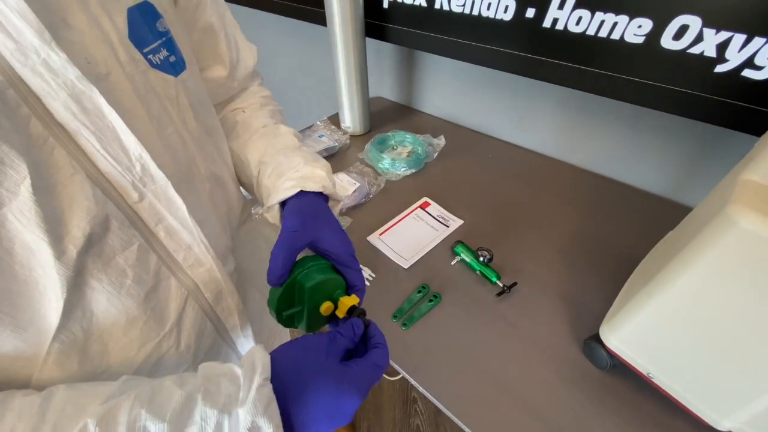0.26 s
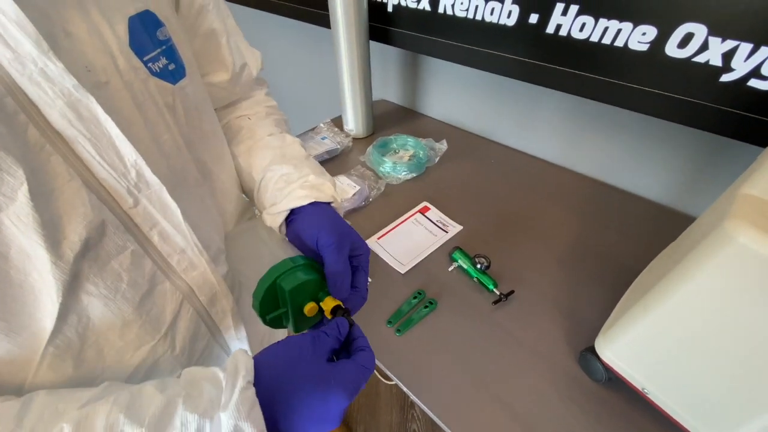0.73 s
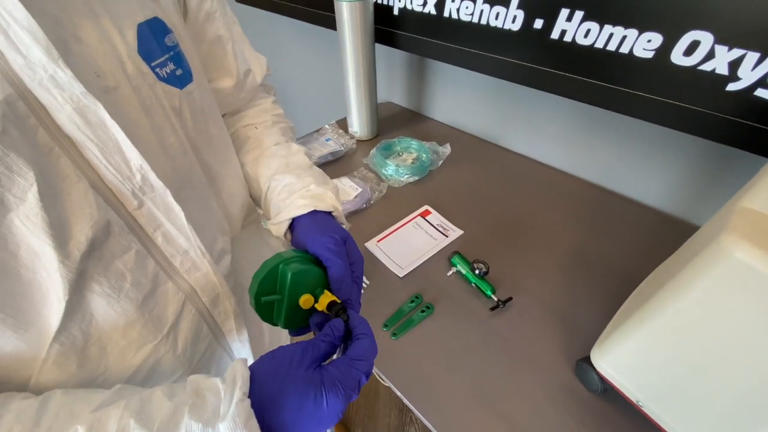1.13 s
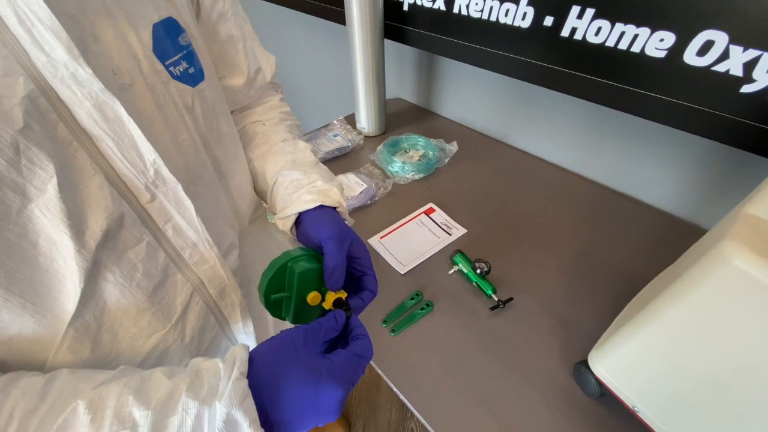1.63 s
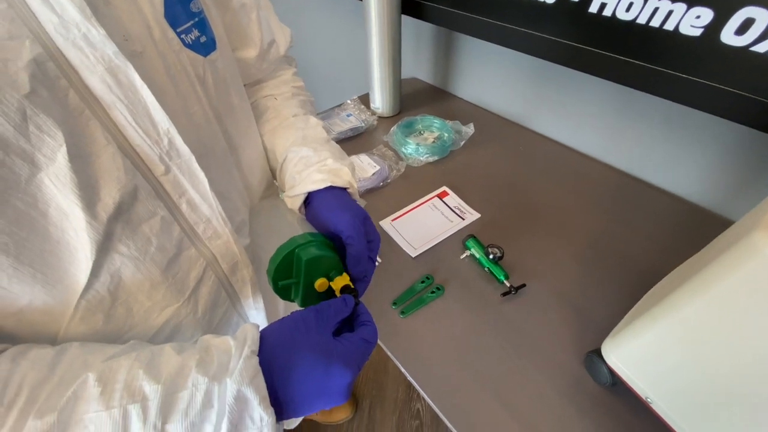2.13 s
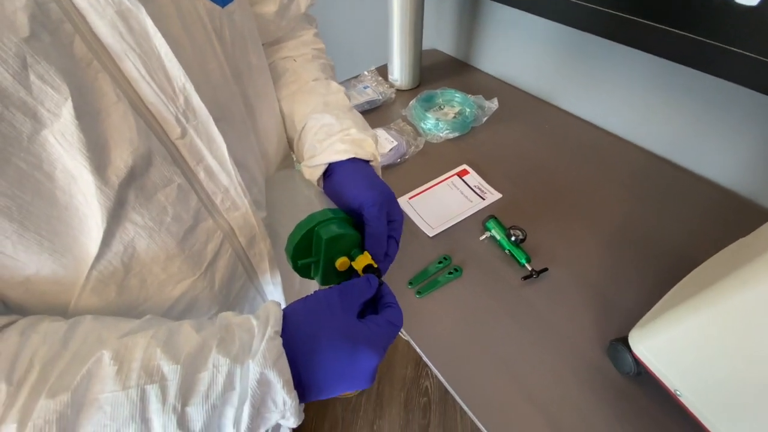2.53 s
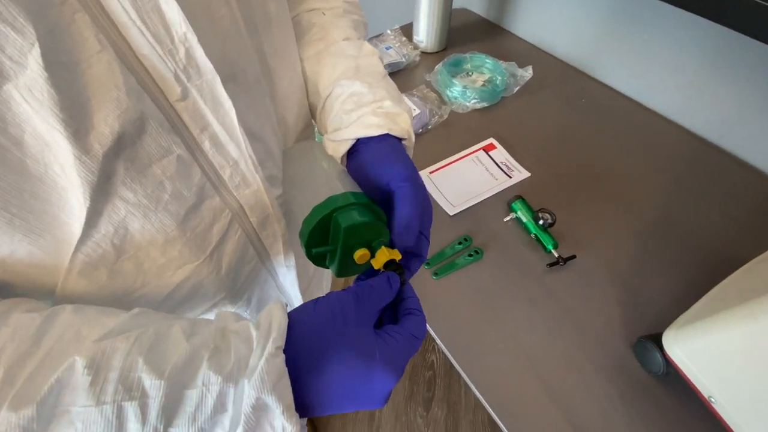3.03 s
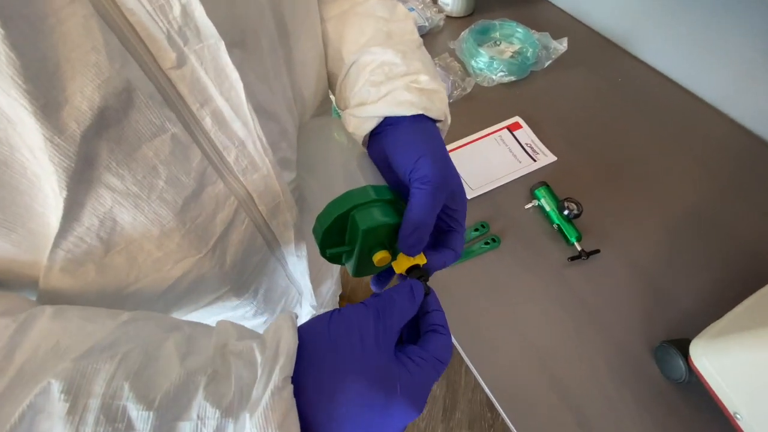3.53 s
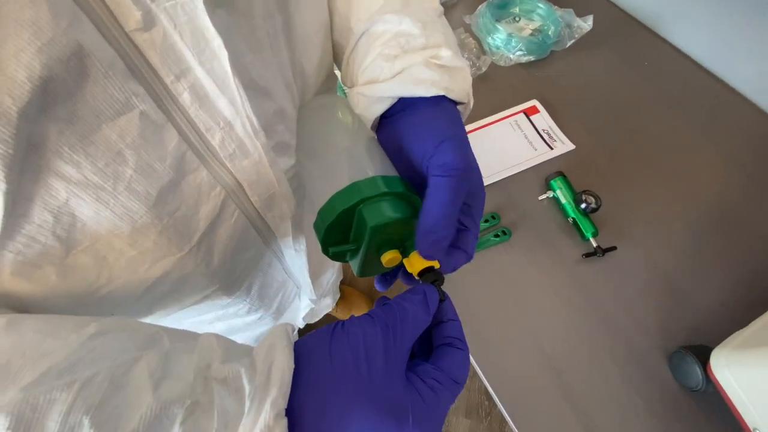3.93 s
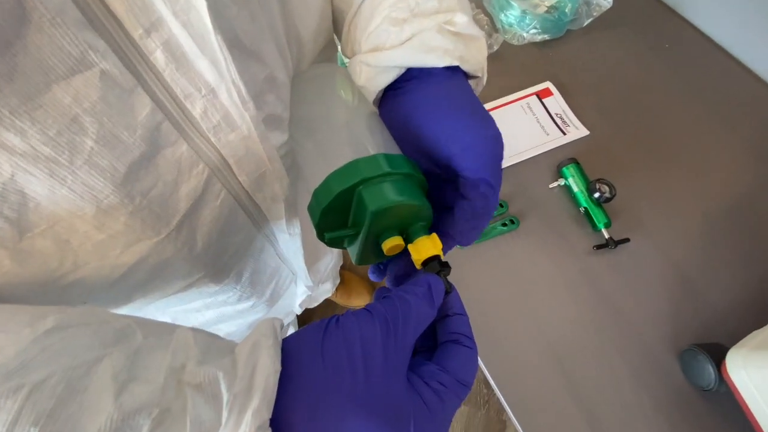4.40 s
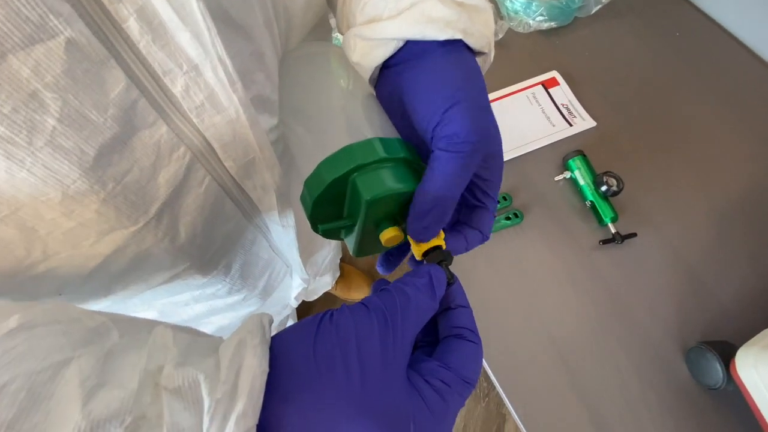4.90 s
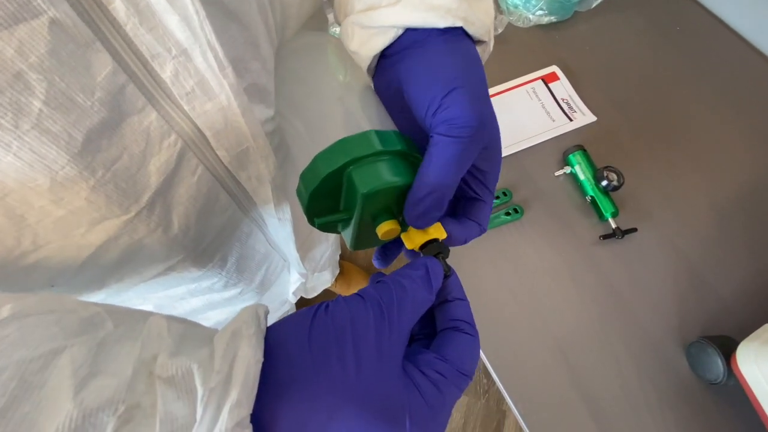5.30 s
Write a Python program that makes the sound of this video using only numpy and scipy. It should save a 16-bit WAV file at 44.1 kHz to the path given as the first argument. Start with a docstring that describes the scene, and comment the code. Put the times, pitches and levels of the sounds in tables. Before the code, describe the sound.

A two-piston compressor drones continuously, pulsing quickly under soft hiss and panel buzz. A brief scuff and low, boomy thump open the scene; sharp little plastic ticks follow around one and a half to two seconds, about three, and in a brighter cluster near five. Close hand-held stereo microphone, short dull room reverberation, whistle and upper hum changing as it moves closer.

```python
"""Oxygen concentrator and handled bottle

An oxygen concentrator runs in a small room: its two-piston compressor hums as a comb of shaft harmonics,
its fan sings in fluttering blade tones, and its valves rasp as resonances driven by repeating noise.
Gloved hands bump a plastic humidifier bottle once (decaying low modes and a noise boom), then turn its
fitting, which clicks and scrapes: short noise forces that ring the resonances of the plastic.
The hand-held microphone drifts nearer through the cabinet's narrow beams, so hum and whine change colour."""
import sys
import numpy as np
from scipy import signal
from scipy.fft import rfft, irfft, next_fast_len
from scipy.io import wavfile
from scipy.ndimage import uniform_filter1d, map_coordinates

SR = 44100
rng = np.random.default_rng(int(sys.argv[2]) if len(sys.argv) > 2 else 0)


def waveform_to_disk(signal):
    """Save audio, clipped to [-1, 1], as 16-bit WAV at the path in sys.argv[1]."""
    frames = np.transpose(np.atleast_2d(signal))
    scaled = np.clip(frames, -1, 1) * 32767
    samples = np.round(scaled).astype(np.int16)
    wavfile.write(sys.argv[1], SR, samples)


N = 244783
T = np.arange(N) / SR
SIZE = next_fast_len(N, real=True)
BINS = np.maximum(np.arange(SIZE // 2 + 1) * SR / SIZE, 1)  # Hz
SIDES = np.array([[1], [-1]])  # left, right
PORT_LAG_S = .00045  # arrival at the left microphone port after the right one


def undb(db):
    """Decibel law: amplitude ratio of a level."""
    return 10 ** (np.asarray(db) / 20)


def curve(rows):
    """Linear interpolation through (time_s, value) rows."""
    return np.interp(T, *np.transpose(rows))


def pan(db):
    """Constant-power panning: left and right gains from the left minus right level."""
    gains = undb(SIDES * db / 2)
    return gains / np.sqrt(np.mean(gains ** 2, axis=0))


def walk(rate_hz):
    """Low-pass random process: smooth chance with spread 1, changing about rate_hz times a second."""
    step = int(SR / rate_hz / 2)
    steps = np.repeat(rng.standard_normal(N // step + 1), step)
    smooth = uniform_filter1d(uniform_filter1d(steps, step), step)[:N]
    return smooth / smooth.std()


def colour(points):
    """Spectral shaping: gain per bin from (pitch_hz, level_db) points, falling steeply beyond the ends."""
    hz, db = np.transpose(points)
    gain = undb(np.interp(np.log(BINS), np.log(hz), db))
    low_edge = np.minimum(1, BINS / hz[0]) ** 4
    high_edge = np.minimum(1, hz[-1] / BINS) ** 4
    return gain * low_edge * high_edge


def resonances(modes, bins):
    """Modal response: power sum of damped resonances, each at least 1/45 of its pitch wide, as a gain."""
    power = 0
    for hz, width_hz, db in modes:
        detuning = (bins ** 2 - hz ** 2) / (bins * max(width_hz, hz / 45))
        power = power + undb(2 * db) / (1 + detuning ** 2)
    return np.sqrt(power)


def ports(pair, gain, likeness=0.13, diffuse_hz=900):
    """Spatial coherence: the ports share less of the noise as pitch rises; all reaches the right first."""
    alike = np.clip(likeness + (1 - likeness) / (1 + (BINS / diffuse_hz) ** 2), 0, 1)
    mid, side = rfft(pair, SIZE)
    both = mid * np.sqrt(1 + alike) + SIDES * side * np.sqrt(1 - alike)
    both = both * np.exp(-1j * np.pi * BINS * PORT_LAG_S * SIDES)
    return irfft(both * gain, SIZE)[:, :N] * np.sqrt(SR) / 2


def room_noise(gain):
    """Filtered white noise with the given gain per Hz."""
    return ports(rng.standard_normal((2, SIZE)), gain)


def rattle(turns, gain, size=1500, change=0.38):
    """Cyclic excitation: a jumble of tiny impacts recurs each shaft turn and changes only slowly."""
    cycles = []
    for cycle in rng.standard_normal((4, size)):
        cycles.append(map_coordinates(cycle, [turns % 1 * size], order=2, mode="grid-wrap"))
    cycles = np.array(cycles)
    drift = change * walk(2.08)
    return ports(np.cos(drift) * cycles[:2] + np.sin(drift) * cycles[2:], gain)


# How far the left port trails the right for steady tones: pitch_hz, lag_rad
TONE_LAG = [(60, .35), (150, .35), (320, .8), (410, 1.5), (520, 1.6), (760, 1.7), (1100, 2.3), (1200, 2.7)]


def tone(phase, hz, db, pan_db):
    """Interaural-like phase difference: one line at both ports, reaching the right one first."""
    lag = np.interp(hz, *np.transpose(TONE_LAG))
    return np.sqrt(2) * undb(db) * pan(pan_db) * np.cos(phase - SIDES * lag / 2)


# Narrow beams, each loudest at one place on the microphone's way:
# pitch_hz, half_width_hz, lift_db, place (0-1), reach (share of the way)
CABINET_BEAMS = [(736, 14, 12, .17, .31), (765, 14, 15.5, .36, .28), (794, 12, 6, .27, .3),
                 (556, 14, 6.5, .9, .45), (665, 50, 3, .9, .42), (1115, 14, 16, .7, .33),
                 (1202, 20, 14.5, .87, .42), (4700, 300, 6, .67, .2)]


def beam_db(hz, place):
    """Directivity: lift of a line at hz where the microphone crosses the cabinet's beams."""
    lift_db = 0
    for centre_hz, width_hz, db, spot, reach in CABINET_BEAMS:
        lift_db = lift_db + db * np.exp(-((hz - centre_hz) / width_hz) ** 2 - ((place - spot) / reach) ** 2)
    return lift_db


# Compressor shaft speed, before a slight random wander: time_s, turns_hz
SHAFT_SPEED = [(0, 29.48), (1.3, 29.35), (5.55, 29.13)]
# Shaft harmonics; the two pistons stress the low even ones:
# multiple, level_db (at place 0, before beams and waver)
HUM_HARMONICS = [(2, -41.5), (4, -40), (5, -50.5), (6, -56.5), (8, -60), (9, -61), (10, -54), (11, -60),
                 (12, -61), (13, -61), (14, -57.5), (15, -57.5), (16, -59.5), (17, -63), (18, -56),
                 (19, -58.5), (20, -58), (21, -59.5), (22, -64), (23, -65), (24, -60.5), (25, -58),
                 (26, -58), (27, -63.5), (28, -65), (29, -65), (31, -68), (37, -66), (38, -65.5), (39, -65),
                 (41, -69), (43, -68)]
# Balance of the hum between the ports: pitch_hz, left_minus_right_db
HUM_BALANCE = [(60, 0), (170, -2), (240, 0), (350, 19), (400, -4.5), (480, -4), (620, -10.5), (740, -10.5),
               (830, -1.5), (1150, -7)]


def compressor(turns, place, rise_db=2.5, waver_db=2.5, phase_waver_rad=0.22):
    """Harmonic series of piston strokes; the room makes upper lines waver, least where a beam hits."""
    out = 0
    wavers = [walk(4) for _ in range(9)]  # shared out among the harmonics
    for row, (k, db) in enumerate(HUM_HARMONICS):
        hz = k * SHAFT_SPEED[0][1]
        scatter = min(1, (k / 8) ** 2)
        lift_db = beam_db(hz, place)
        level_waver_db = waver_db * np.sqrt(scatter * undb(-lift_db)) * wavers[row % len(wavers)]
        level_db = db + rise_db * place + lift_db + level_waver_db
        phase_waver = phase_waver_rad * wavers[(row + 2) % len(wavers)]
        shift = scatter * (rng.uniform(-np.pi, np.pi) + phase_waver)
        balance_db = np.interp(hz, *np.transpose(HUM_BALANCE))
        out = out + tone(2 * np.pi * k * turns + shift, hz, level_db, balance_db)
    return out


# Harmonics of the fan shaft:
# multiple, level_db (mean at place 0), rise_db (place 0 to 1), left_minus_right_db, flutter_db
FAN_HARMONICS = [(2, -59, 2, 0, 2), (3, -40.8, 2, 5, .8), (6, -45.5, -9, -8, 1.6), (9, -58, -8, -5, 2)]


def fan(place, shaft_hz=85.97, wobble_rad=0.23):
    """Blade-passing tones, modulated by the turbulent intake, grow or fade along the microphone's way."""
    out = 0
    for k, db, rise_db, pan_db, flutter_db in FAN_HARMONICS:
        phase = 2 * np.pi * k * shaft_hz * T + wobble_rad * walk(16)
        level_db = db + rise_db * place + flutter_db * walk(5.3)
        out = out + tone(phase, k * shaft_hz, level_db, pan_db)
    return out


def motor(mains_hz=60, order=6, db=-54, flutter_db=2):
    """Magnetic hum: the windings buzz on a harmonic of the mains."""
    hz = order * mains_hz
    return tone(2 * np.pi * hz * T, hz, db + flutter_db * walk(6), 0)


# Valve and cabinet resonances, before stroke, leak and rise: pitch_hz, width_hz, level_db (per Hz)
VALVE_MODES = [(3880, 230, -93), (4250, 230, -95), (5430, 200, -92), (5740, 280, -91.5)]
# Close pair of valve resonances that whistles, likewise: pitch_hz, width_hz, level_db (per Hz)
WHISTLE_MODES = [(4640, 110, -94), (4770, 150, -91)]


def valves(turns, place, stroke_db, rise_db=6.5, whistle_rise_db=9.5, pan_db=10, pan_drift_db=-7, leak_db=-7):
    """Forced resonance: valve chatter and leaking air rasp and whistle with each stroke."""
    def rasp(modes):
        """Source-filter principle: cyclic chatter and leak noise excite the given resonances."""
        ring = resonances(modes, BINS) / (1 + (BINS / 7000) ** 6)
        source = rattle(turns, ring) + undb(leak_db) * room_noise(ring)
        return source * undb(stroke_db + walk(8)) * pan(pan_db + pan_drift_db * place)

    whistle_lift_db = whistle_rise_db * place + beam_db(WHISTLE_MODES[0][0], place)
    return rasp(VALVE_MODES) * undb(rise_db * place) + rasp(WHISTLE_MODES) * undb(whistle_lift_db)


# Cabinet panels that buzz with the pistons, before stroke and waver:
# pitch_hz, width_hz (at half amplitude), level_db (per Hz at place 0), rise_db (place 0 to 1)
PANEL_MODES = [(1350, 76, -86, 0.5), (1570, 160, -89.5, 9.5), (1715, 71, -84.5, 3), (2050, 83, -91, -6),
               (2185, 110, -85.5, -0.5), (2463, 150, -81, -11), (2570, 130, -104, -3),
               (2790, 90, -86.5, -2.5), (3330, 140, -92, -1)]


def panels(turns, place, stroke_db, waver_db=2.2):
    """Sympathetic vibration: the recurring piston impacts drive each panel resonance."""
    out = 0
    for hz, width_hz, db, rise_db in PANEL_MODES:
        buzz = rattle(turns, resonances([(hz, width_hz, 0)], BINS) ** 2)
        out = out + buzz * undb(db + rise_db * place + stroke_db + waver_db * walk(6))
    return out


# Air rushing through the cabinet, before the stroke: pitch_hz, level_db (per Hz)
RUSH_SPECTRUM = [(25, -82), (35, -87), (50, -64), (90, -77.5), (140, -68.5), (200, -79), (250, -66),
                 (320, -77.5), (490, -75), (620, -77.5), (760, -70.5), (950, -88), (1150, -76),
                 (1400, -92.5)]
# Broad hiss of the air flow, before stroke and rise: pitch_hz, level_db (per Hz)
HISS_SPECTRUM = [(1000, -102), (1550, -91), (1850, -88.5), (2250, -86), (2650, -90), (3000, -93),
                 (3500, -92.5), (3900, -91), (4500, -91.5), (5100, -97.5), (5750, -94), (6400, -99),
                 (7000, -99), (9300, -97.5), (10200, -99.5), (15000, -102)]
# Piston clatter through the cabinet, before stroke and rise: pitch_hz, level_db (per Hz)
CLATTER_SPECTRUM = [(900, -89.5), (1000, -84), (1130, -97), (1350, -92.5), (1570, -100.5), (1850, -95.5),
                    (2300, -103), (3000, -105)]


def air(turns, place, throb_db=1.1, uneven_db=1.4, hiss_rise_db=0.5, flicker_db=.8):
    """Amplitude modulation: flow noise and mechanical rasp swell on each of two unequal strokes a turn."""
    angle = 2 * np.pi * (turns - .22)
    stroke_db = throb_db * np.cos(2 * angle) + uneven_db * np.cos(angle)
    clatter = rattle(turns, colour(CLATTER_SPECTRUM)) * undb(stroke_db) * pan(-3.5)
    rush = room_noise(colour(RUSH_SPECTRUM)) * undb(0.82 * stroke_db + 0.3 * walk(4.1))
    hiss = room_noise(colour(HISS_SPECTRUM)) * undb(0.42 * stroke_db + flicker_db * walk(26))
    mechanical = valves(turns, place, stroke_db) + panels(turns, place, stroke_db)
    return mechanical + rush + (hiss + clatter) * undb(hiss_rise_db * place)


def add(out, start_s, sound):
    """Superposition: mixes a sound in at its start time."""
    start = max(0, int(start_s * SR))
    out[:, start:start + sound.shape[-1]] += sound[..., :N - start]


# What the bottle and its lid ring with: pitch_hz, width_hz (before the 1/45 floor), level_db (relative)
BOTTLE_MODES = [(810, 770, 7), (1470, 116, 7), (1686, 70, 7), (1878, 56, 8), (2060, 76, 6), (2408, 44, 2.5),
                (2604, 85, 0.5), (3200, 190, 2), (3630, 146, 5.5), (4560, 180, -0.5), (4880, 140, -1.5),
                (5710, 270, 4), (6970, 250, -8), (9690, 840, -3.5), (14000, 1100, -11)]


def contact(envelope, bright_hz, pan_db, octaves=0.89, blow=0, scatter=1.8):
    """Impulse response: a blow and tiny slips ring the bottle; harder contact favours higher modes."""
    size = len(envelope)
    bins = np.maximum(np.arange(size // 2 + 1) * SR / size, 1)
    brightness = 0.1 + np.exp(-(np.log2(bins / bright_hz) / octaves) ** 2)
    gain = resonances(BOTTLE_MODES, bins) * brightness
    # minimum phase: folding the cepstrum makes the ring follow the blow
    cepstrum = irfft(np.log(gain / np.sqrt(np.mean(gain ** 2))))
    fold = (1 + np.sign(size // 2 - np.arange(size))) * np.r_[.5, np.ones(size - 1)]
    response = np.exp(rfft(cepstrum * fold))
    # slips common to both ports, plus slips that differ between them
    slips = rng.standard_normal(size) + scatter * rng.standard_normal((2, size))
    force = slips * envelope
    force[:, np.argmax(envelope)] += blow * np.sqrt(np.sum(envelope ** 2))
    left_delay = np.exp(-1j * np.pi * bins * PORT_LAG_S * (1 + SIDES))
    burst = irfft(rfft(force) * response * left_delay)
    # the burst gets the energy of its envelope
    return burst * np.sqrt(2 * np.sum(envelope ** 2) / np.sum(burst ** 2)) * pan(pan_db)


# Gloves and thread rubbing: start_s, length_s, level_db (before grain), brightest_hz
RUB_EVENTS = [(.033, 0.014, -39.5, 11900), (.034, 0.056, -44.5, 3040), (0.039, 0.055, -51, 12500),
              (0.063, 0.077, -52.5, 2200), (1.438, 0.021, -45.5, 2190), (2.236, 0.029, -54, 2000),
              (2.57, 0.042, -50, 2290), (2.895, 0.037, -49, 2500), (3.198, 0.1, -51, 2550),
              (3.525, 0.038, -47, 2400), (4.131, 0.042, -49.5, 2580), (4.462, 0.057, -50, 2500),
              (4.889, 0.025, -41.5, 4700), (4.891, .016, -51, 13500), (4.906, 0.022, -44.5, 2610)]


def rubs(out, size=8192):
    """Stick-slip friction: each rub swells and fades with a random grain."""
    t = T[:size]
    for start_s, length_s, db, bright_hz in RUB_EVENTS:
        swell = np.sin(np.pi * np.minimum(t / length_s, 1) ** 0.82)
        grain = np.repeat(undb(4.5 * rng.standard_normal(size // 64)), 64)
        add(out, start_s, undb(db) * contact(swell * grain, bright_hz, 0))


# Dull knock of the bottle: pitch_hz, level_db (at the start, before the attack), t60_s
KNOCK_MODES = [(116, -30, 0.2), (128, -9, 0.088), (252, -23, 0.043), (410, -33, 0.13)]
# Boom that the knock leaves in the room, before attack and decay: pitch_hz, level_db (per Hz)
BOOM_SPECTRUM = [(80, -48), (130, -51), (220, -62), (400, -55), (700, -62), (1100, -68)]


def knock(attack_s=0.0029, boom_t60_s=0.26):
    """Free damped vibration: the bumped bottle rings low and the room booms briefly."""
    ring = 0
    for hz, db, t60_s in KNOCK_MODES:
        ring = ring + undb(db - 60 * T / t60_s) * np.sin(2 * np.pi * hz * T)
    boom = room_noise(colour(BOOM_SPECTRUM)) * np.exp(-np.log(1000) * T / boom_t60_s)
    return (ring + boom) * (1 - np.exp(-T / attack_s))


# Plastic clicks of the fitting:
# start_s, level_db (before attack and fade), brightest_hz, spread_octaves, left_minus_right_db
CLICK_EVENTS = [(1.4465, -34, 2000, 1, -11), (1.452, -35, 2200, 1, -10), (1.4775, -35, 8500, .8, -4),
                (1.4777, -20.5, 5700, 0.26, 13), (1.4785, -28.5, 3200, .4, 6),
                (1.4803, -29, 2060, 0.41, -9), (1.8408, -22.5, 1480, 0.51, -8),
                (1.8433, -24.5, 3600, 0.82, 9), (1.8459, -23, 1520, 1.1, -5),
                (1.8458, -25.5, 4500, 0.7, 11), (2.9153, -24, 2110, 0.19, -8),
                (2.9157, -27.5, 3640, 0.65, 11), (2.92, -35, 2600, 0.79, 7), (3.543, -26, 2040, 0.2, -7),
                (3.86, -33.5, 1940, 0.45, -7), (3.9537, -32, 5500, 1.7, 3), (4.2675, -34, 4060, 2.1, 7),
                (4.4722, -33.5, 2700, 1, 3), (4.483, -37, 2200, 0.9, 0), (4.539, -33.5, 2400, 2.2, 2),
                (4.589, -29, 1700, 1.9, -23), (4.8842, -25.5, 11200, 0.52, 1),
                (4.8895, -29.5, 2000, 1.1, 0), (4.9048, -21.5, 2700, 1, 3), (4.9078, -24, 3630, .25, 11),
                (4.9107, -22, 1750, 1.1, -8), (4.9138, -35, 1850, .4, -2), (4.917, -39, 2500, 0.95, -3),
                (5.5122, -32.5, 2620, 1, -10), (5.525, -34, 2500, 1.2, -5)]


def clicks(out, size=8192, fade_at_2khz_s=0.002, shortening=0.55, attack_s=0.00027):
    """Impact excitation: short contacts ring the plastic, the brighter ones more briefly."""
    t = T[:size]
    for start_s, db, bright_hz, octaves, pan_db in CLICK_EVENTS:
        fade_s = fade_at_2khz_s * (2000 / bright_hz) ** shortening
        envelope = np.exp(-t / fade_s) * (1 - np.exp(-t / attack_s))
        click = contact(envelope, bright_hz, pan_db, octaves, blow=1.55, scatter=.5)
        add(out, start_s, undb(db) * click)


def room(x, t60_s=.2, dull_hz=4500):
    """Reverberation: convolution with the short, dull, decaying noise tail of the walls."""
    t = T[:SR // 2]
    tail = rng.standard_normal((2, len(t))) * np.exp(-np.log(1000) * t / t60_s) * (t > .004)
    tail = tail / np.sqrt(np.sum(tail[0] ** 2))
    tail = signal.sosfilt(signal.butter(1, dull_hz, fs=SR, output="sos"), tail)
    return signal.fftconvolve(x, tail, axes=1)[:, :N]


def handling(room_db=-9.5, knock_s=.0606):
    """Direct and reverberant sound: rubs and clicks with the room's tail, and the knock."""
    plastic = np.zeros((2, N))
    rubs(plastic)
    clicks(plastic)
    out = plastic + undb(room_db) * room(plastic)
    add(out, knock_s, knock())
    return out


# The microphone's drift past the machine: time_s, place (0-1 along the way)
MICROPHONE_PATH = [(0, 0), (.3, .12), (1.2, .28), (2.35, .38), (3.15, .62), (5.55, 1)]


def scene():
    """Superposition of the machine's sources and the handling close by."""
    turns = np.cumsum(curve(SHAFT_SPEED) + .025 * walk(4)) / SR
    place = curve(MICROPHONE_PATH)
    return compressor(turns, place) + fan(place) + motor() + air(turns, place) + handling()


def record(dry, fade_in_s=.006, top_hz=15300):
    """Band limiting: a short fade-in and a steep elliptic low-pass that cuts the top."""
    faded = dry * np.minimum(1, T / fade_in_s)
    return signal.sosfilt(signal.ellip(8, .2, 70, top_hz, fs=SR, output="sos"), faded)


dry = scene()
out = record(dry)
waveform_to_disk(out)
```